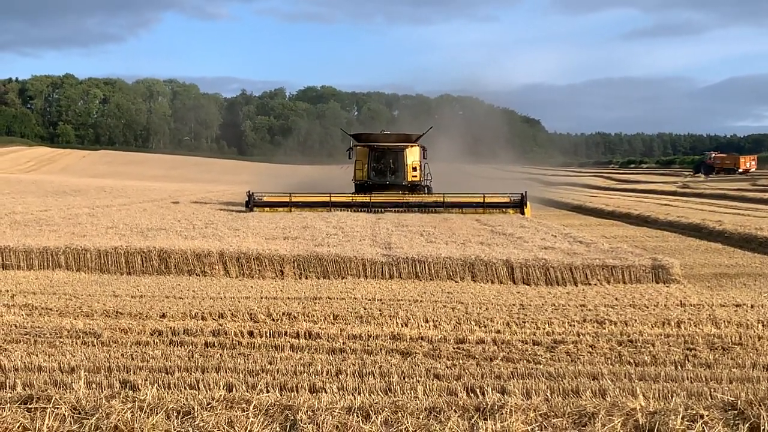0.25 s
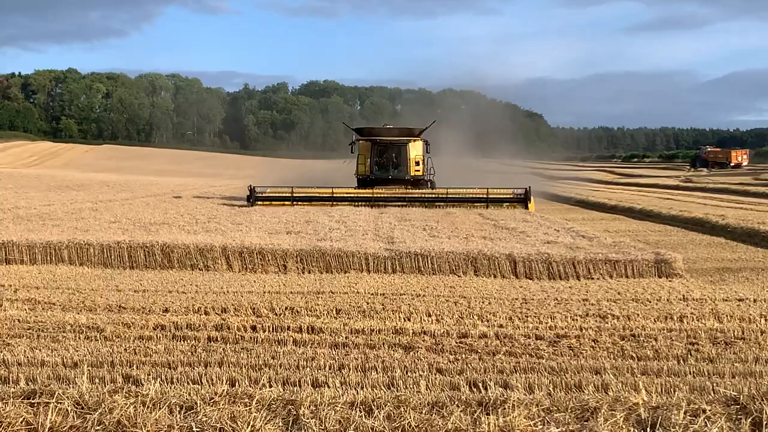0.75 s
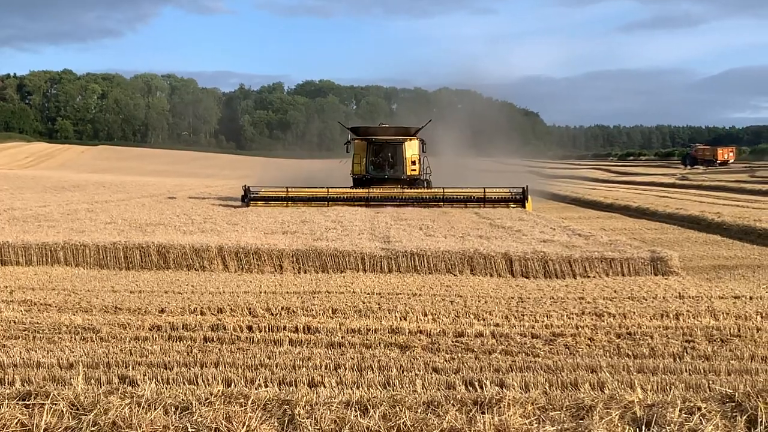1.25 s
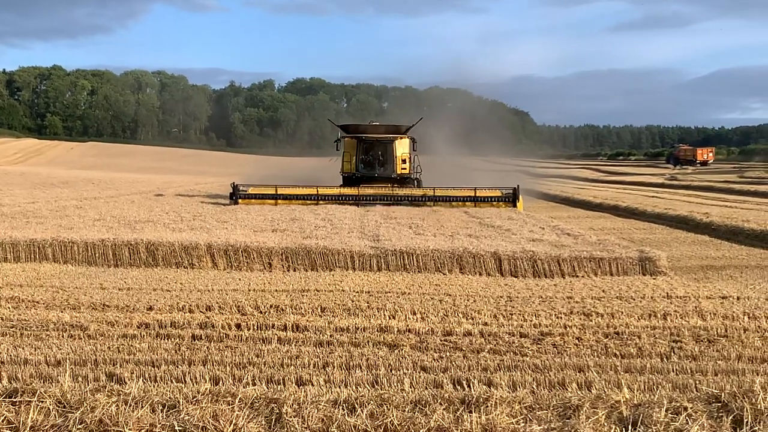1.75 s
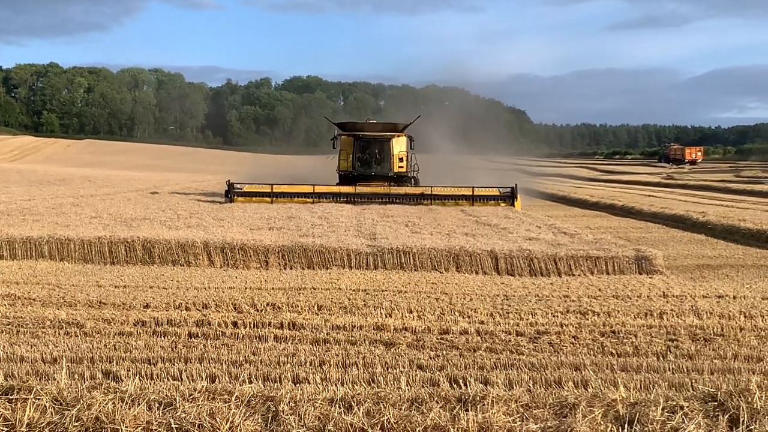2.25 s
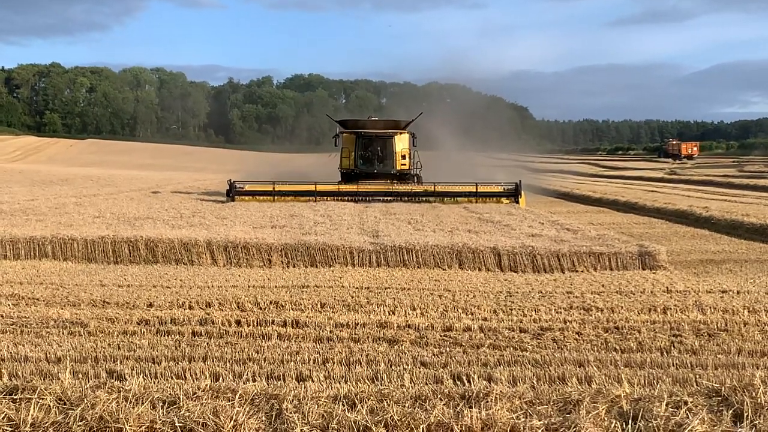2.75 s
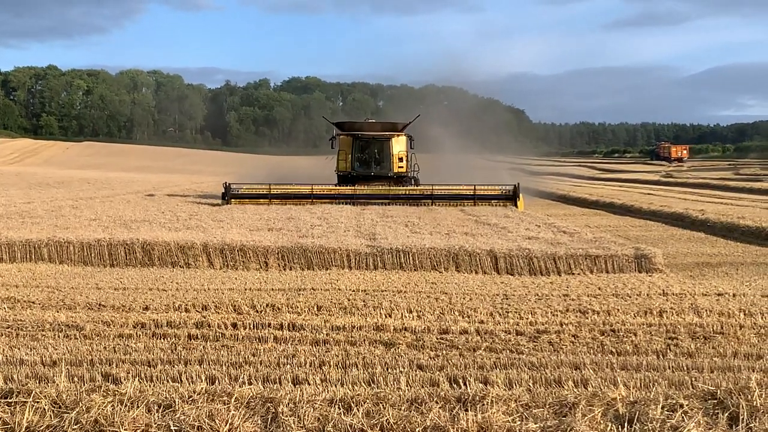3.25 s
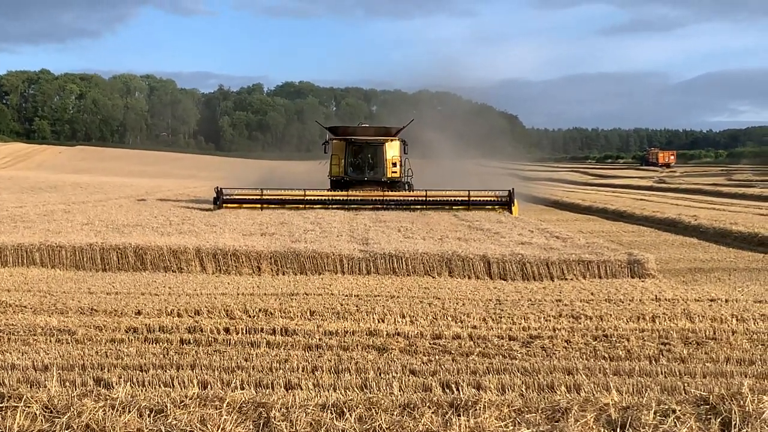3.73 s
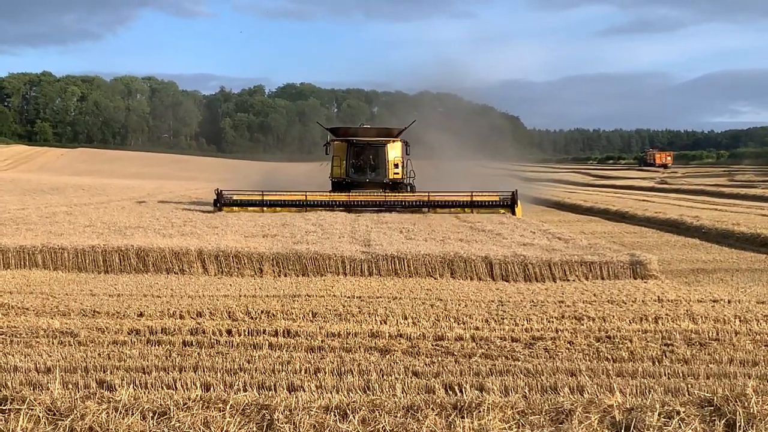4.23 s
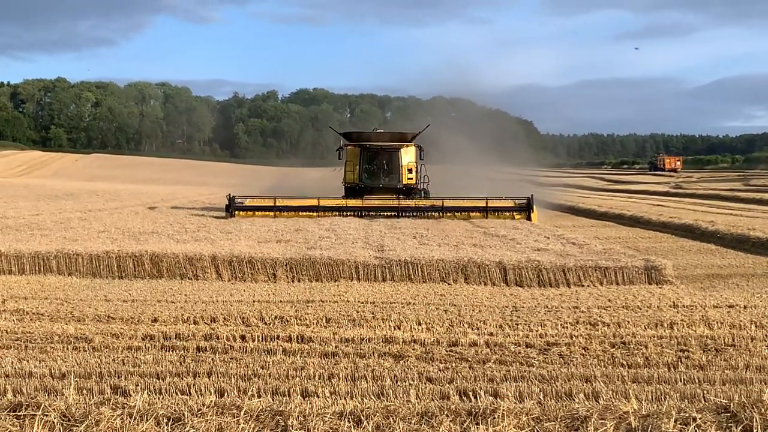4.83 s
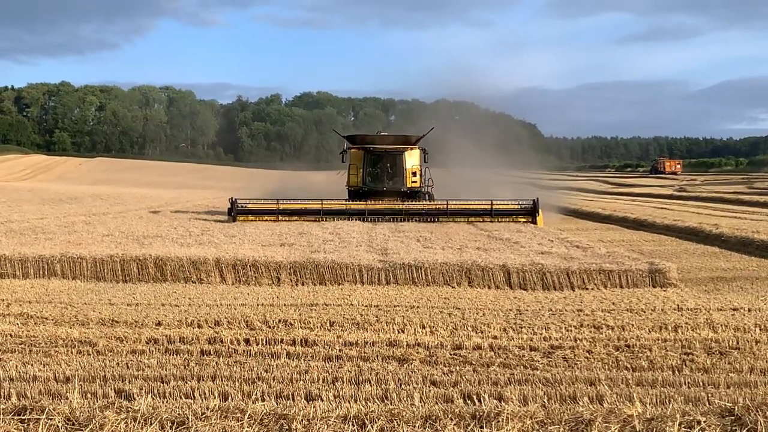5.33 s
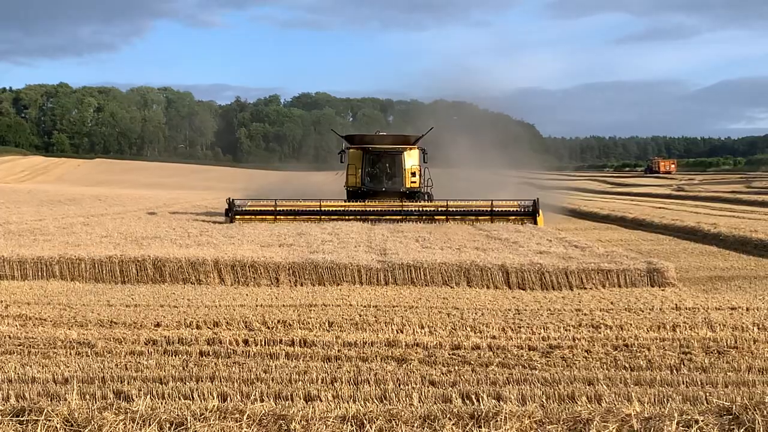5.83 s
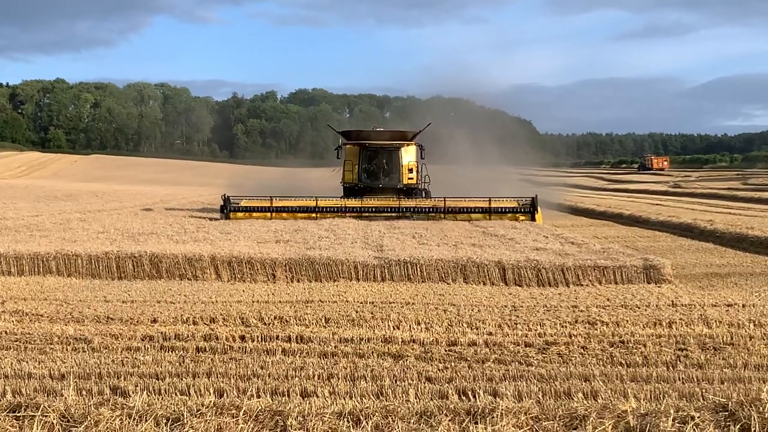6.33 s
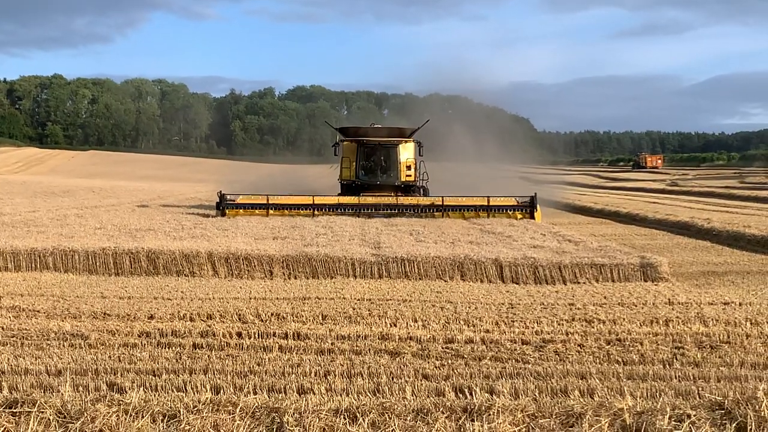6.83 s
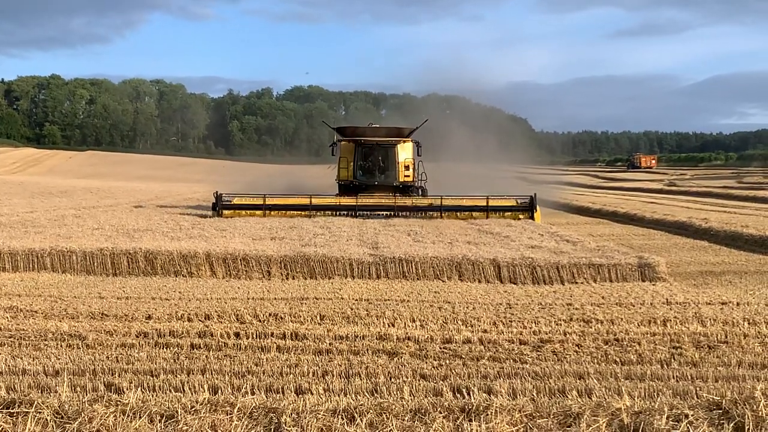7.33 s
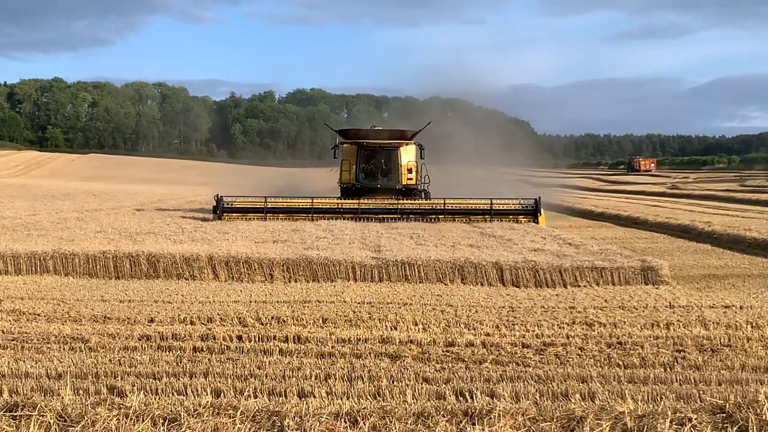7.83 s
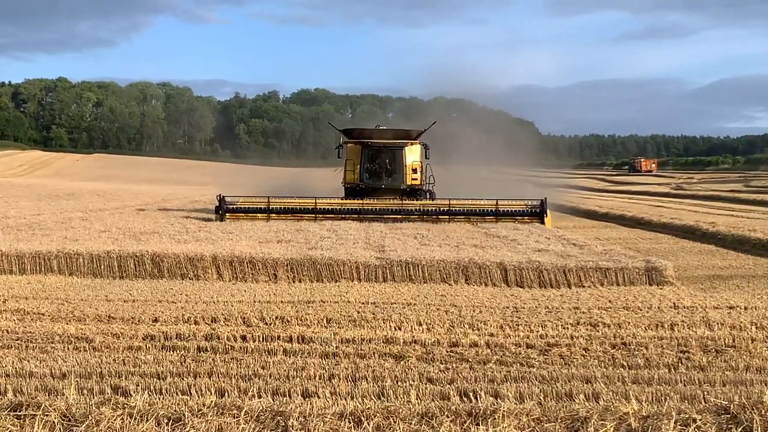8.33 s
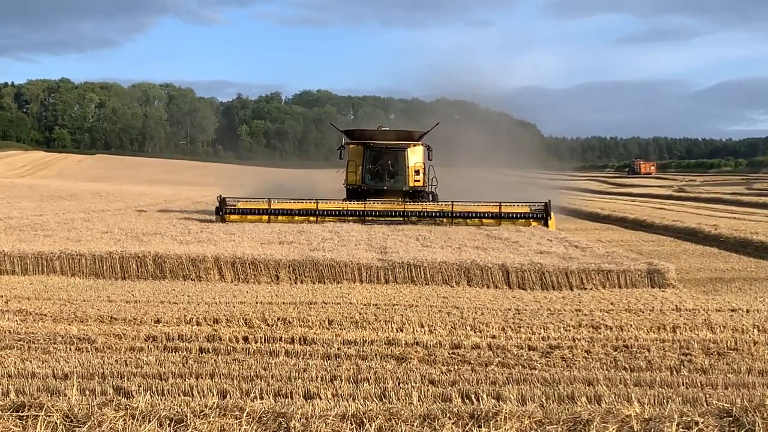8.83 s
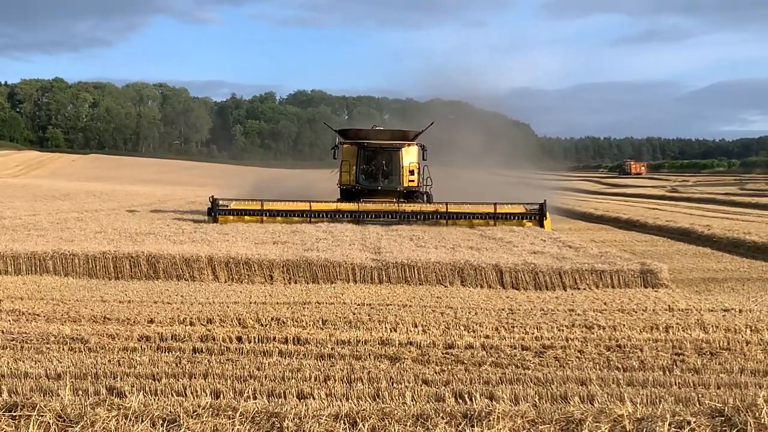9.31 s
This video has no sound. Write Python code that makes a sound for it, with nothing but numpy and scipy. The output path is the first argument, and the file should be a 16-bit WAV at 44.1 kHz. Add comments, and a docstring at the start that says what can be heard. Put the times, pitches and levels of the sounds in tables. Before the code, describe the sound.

From 0 to about 9.5 seconds a combine harvester runs without pause in an open field, starting roughly sixty metres off and coming straight on, so the sound grows slightly louder and fuller. A deep, wavering drone of engine, rotor and threshing drum sits on low rumble, with drum swells near 0.5, 3.7, 4.8, 6.4, 7.7 and 8.6. A thin mid-pitched gear whine flutters rapidly and drifts in strength; a pump hum emerges more after 5. Crop roar and dry chaff hiss shake about five or six times a second, with brief surges and a duller hiss around 3.4 and 5.5. Small dull ticks or knocks come at 1.9, 2.6 and 3. Short panel clanks scatter over a faint patter, denser after 3, strongest near 6.6. The distant hand-held stereo pickup has tight reflections and a diffuse, airy spread.

```python
"""Far across a stubble field, a combine harvester cuts wheat and slowly draws nearer.
Engine, drum, rotor and pump drone as wavering sine tones; the gear whine throbs once a shaft turn.
Crop roar and chaff hiss are bands of noise that follow the beat of the sieves; rumble and growl lie below.
Loose panels ring when struck, and a few dull ticks and knocks are heard.
Short echoes and scattered sound join the direct sound at a hand-held pair of microphone ports."""
import sys
import numpy as np
from scipy import signal
from scipy.fft import rfft, irfft, next_fast_len
from scipy.io import wavfile

SR = 44100
rng = np.random.default_rng(int(sys.argv[2]) if len(sys.argv) > 2 else 0)


def wrap_up_sound(samples):
    """Save the sound to the file named by the first command line argument, as 16-bit audio."""
    columns = np.atleast_2d(samples).T
    # keep every value between -1 and 1, then stretch to whole-number steps
    tamed = np.clip(columns, -1, 1)
    steps = np.round(tamed * 32767).astype(np.int16)
    wavfile.write(sys.argv[1], SR, steps)


N = 422017  # samples, about 9.57 s
SIZE = next_fast_len(N + 2048)  # padded length for work on frequencies
HZ = np.maximum(np.arange(SIZE // 2 + 1) * SR / SIZE, 1)

# Table levels come before nearing, wavering, the paths to the ports and the final trim.
# gear whine, wavering in pitch and level: start_s, pitch_hz, level_db, companion_level_db
GEAR = [(0, 633, -46.5, -53), (.5, 636, -49, -58), (.65, 640, -54, -58), (.8, 635.6, -45.5, -55),
        (1.3, 636.1, -48, -53), (1.8, 635, -48, -65), (2.4, 635, -50, -54), (3.2, 632.4, -55, -65),
        (3.9, 640, -48.5, -66), (4.13, 636, -60, -58), (4.45, 634, -46.5, -58), (4.75, 633.5, -54, -58),
        (5, 632, -51.5, -62), (5.4, 636, -47.5, -66), (6.1, 634, -50.5, -58), (6.6, 639, -45, -51),
        (7, 635.5, -48, -51.5), (7.75, 638, -44.5, -48.5), (8.1, 634, -50, -57), (8.7, 635, -50.5, -55),
        (9.2, 636, -43.5, -51), (9.57, 635.8, -45, -57)]
COMPANION_RATIO = 2.2  # companion pitch over gear pitch
SHAFT_HZ, SHAFT_DEPTH = 23.35, 0.51  # once a turn the gear mesh tightens
FIRING_HZ, DRUM_HZ, PUMP_HZ, HUM_HZ = 95, 144.3, 293.4, 402.2
ROTOR_HZ = 10.71  # a slow rotor, heard by its multiples
# exhaust tones: multiple of the firing rate, level_db
EXHAUST = [(.5, -43.5), (1, -38.5), (2, -39.5), (3, -54)]
# rotor tones: multiple of the rotor rate, level_db
ROTOR = [(6, -39), (7, -42.5), (10, -40.5), (12, -47), (14, -44.5), (15, -43), (16, -50.5), (17, -54),
         (18, -49), (20, -53.5)]
# other steady tones: pitch_hz, level_db
FAINT_TONES = [(34, -53), (45.2, -47), (52.8, -50), (68, -39), (75.8, -40), (89.2, -40.5), (177.8, -46),
               (1157, -61)]
# threshing drum tone, its level rising and falling irregularly: start_s, level_db
DRUM = [(0, -34.5), (.45, -28.5), (1, -33), (3.1, -32.5), (3.7, -26.5), (4.1, -34), (4.8, -27),
        (5.3, -33.5), (6.4, -25.5), (7.1, -32), (7.7, -26), (8.1, -31), (8.6, -25.5), (9.57, -32.5)]
# uneven throbs of the drum: rate_per_s, depth_db, start_turns
DRUM_THROBS = [(5.54, 2.5, 0.13), (2.72, 2.2, 0.54)]
# throb of the tone at half the drum pitch: rate_per_s, depth_db, start_turns
HALF_DRUM_THROB = (2.78, 4.0, 0.077)
HALF_DRUM_DB = -39
# pump and hum rising out of the noise: start_s, pump_db, pump_second_multiple_db, hum_db
HUMS = [(0, -52, -58, -59), (1.0, -51.5, -64, -63), (2.2, -53.5, -62, -56), (3.1, -51, -60, -56.5),
        (4, -51.5, -65, -51.5), (5.2, -49.5, -69, -61), (6.4, -47, -65, -54.5), (7.2, -47, -59, -50),
        (8.1, -47, -73, -53), (9, -44.5, -51, -51), (9.57, -48.5, -53, -45.5)]
# a second pump, nearly as fast, beats with the first: rate_per_s, share (0-1), start_turns
PUMP_BEAT = (.96, .7, .097)

# noise colours, before each layer is set to its level: pitch_hz, level_db (per Hz)
RUMBLE_COLOUR = [(20, -50), (33, -16), (48, -19), (65, -4.5), (80, -2.5), (100, -4), (125, -5), (150, -2),
                 (175, -9.5), (200, -9), (240, -12.5), (275, -26), (330, -45), (450, -63)]
GROWL_COLOUR = [(200, -30), (300, 0), (350, 1), (420, -2), (470, 1), (520, .5), (600, -1.5), (800, 0),
                (910, -13), (1050, -42)]
ROAR_COLOUR = [(800, -22), (910, -8.5), (1050, 0.5), (1300, -0.5), (1550, -5.5), (1800, -6), (2100, -12.5),
               (2400, -16.5), (3000, -23), (3500, -27)]
HISS_COLOUR = [(1900, -28), (2500, -6), (3200, -5), (4300, -0.5), (5500, -2), (7000, -2.5), (9000, -5.5),
               (10200, -7), (11000, -15), (13500, -16.5), (14400, -23)]
# how well the air carries the treble, heard in chaff and fan hiss: start_s, level_db
HISS_LEVEL = [(0, -52), (.5, -48.5), (1.3, -50.5), (1.85, -49), (2.6, -52.5), (3.4, -55), (4.6, -51.5),
              (5.5, -54.5), (6.5, -50.5), (7.3, -48.5), (8.2, -48), (8.8, -48.5), (9.57, -51)]
# layer levels: mean_db, db per dB of nearing, db per dB of hiss swing
RUMBLE_LEVEL, GROWL_LEVEL, ROAR_LEVEL = (-25.5, 0.75, 0.024), (-42, 0.59, 0.28), (-43.5, 1.4, 0.45)
# treble tilt: mean_db_per_octave, more per dB of nearing, more per dB of hiss swing
ROAR_BRIGHTENS = (0.1, 1.9, 0.25)
HISS_BRIGHTENS = (-0.63, 0.94, 0.42)
LOW_GROWL_FILLS = 1  # extra dB per dB of nearing, below 460 Hz
# brief surges and dips of the crop noise: middle_s, half_width_s, roar_db, hiss_db
SURGES = [(.03, .08, 5, 1.5), (.42, .05, 1, 1), (1.13, 0.11, 0, 1.5), (2.37, 0.046, 0.5, 0),
          (2.72, .05, 2.5, 1), (2.98, 0.041, 4, -0.5), (3.73, .04, 2, 2), (4.03, 0.032, 0, 2),
          (4.4, 0.097, 1, -2), (5.49, 0.027, 4, -1.5), (6.64, .03, 1, 2), (7.17, 0.037, -3, 4),
          (7.3, .3, 2, -3.5)]
SIEVE_HZ, SIEVE_START = 5.5, -0.18  # strokes a second, turns at the start
START_M, SPEED_M_PER_S = 64, 1.83  # the harvester comes straight on

# clanks of loose panels and chains: start_s, strike_db
CLANKS = [(.2244, -33), (.9552, -35), (1.7065, -36), (3.4605, -38), (6.7401, -38), (8.8792, -31),
          (9.2439, -29.5), (3.007, -40), (3.0947, -32), (3.1614, -32), (3.7145, -32.5), (4.015, -29),
          (4.3914, -29.5), (4.5526, -35), (4.575, -32), (4.7242, -32.5), (4.7915, -37), (5.3308, -31.5),
          (6.6308, -25.5), (6.9147, -32), (6.9842, -28), (7.1741, -31), (7.5155, -33), (7.6658, -30),
          (7.8334, -33), (8.0371, -40), (8.3684, -30), (8.569, -29), (8.9735, -30), (9.2893, -33)]
RATTLES_PER_S, RATTLE_DB = 35, -45  # fainter clanks at random, lowest strike level
# ringing panel: pitch_hz, level_db, t60_s (time to fade by 60 dB)
PANEL = [(1155, -7.5, 0.021), (1481, -10, 0.043), (1550, -8, 0.03), (1928, -15.5, 0.045),
         (2130, -19, 0.027), (2680, -20, .02)]
# dull ticks and knocks: middle_s, peak_db, pitch_hz
TICKS = [(1.8601, -21, 690), (1.987, -31, 650), (2.555, -25, 600), (2.9631, -24, 300), (3.075, -27, 349.4)]
TICK_CYCLES = 0.61  # half width of the bell

# echoes off ground, hand and body to each port: late_ms, gain (a factor)
LEFT_ECHOES = [(0.393, -0.22), (0.814, -0.25), (1.085, 0.13), (1.45, 0.25), (1.74, -0.21), (1.884, 0.34),
               (2.192, -0.094), (3.709, -0.0024)]
RIGHT_ECHOES = [(0.581, 0.088), (0.836, -0.1), (1.093, 0.025), (1.428, 0.18), (1.5, 0.059), (1.744, -0.13),
                (1.897, 0.23), (2.288, -0.23), (2.917, -0.11), (3.721, 0.033)]
ECHO_CUT_HZ, TREBLE_FROM_HZ = 8400, 3300
# the hand shifts and the air stirs:
# start_s, echo_factor, treble_echo_factor, scatter_db, treble_echo_later_ms
AIR = [(0, 0.98, 1.2, -3, -0.0043), (1.5, 0.99, 1.3, -1, 0.0083), (3.5, 0.99, 1.7, 1, -0.016),
       (4.5, 0.9, 0.82, -1, .015), (6, 0.83, 0.36, -1, 0.0026), (7.5, 0.92, 0.82, -1.5, 0.0029),
       (9.57, 0.94, 0.51, -2, 0.026)]
# sound unlike at the two ports: pitch_hz, share_db
SCATTER = [(45, -9), (70, -15.5), (140, -17), (250, -18.5), (500, -12.5), (620, -3), (710, -10),
           (780, -3.5), (900, -5), (1050, -12.5), (2000, -9), (3000, -4), (4000, -1.5), (6600, -3.5),
           (8300, -62), (8900, -4.5), (9900, 0.5), (10500, -30), (11600, -26), (12100, -2), (12600, -31)]
# level difference between the ports: pitch_hz, left_over_right_db
PORT_BALANCE = [(40, 2), (140, 2.5), (200, 8), (280, 4), (420, -1.6), (490, -1.2), (690, -11), (860, -1.5),
                (990, -8.5), (1200, 0), (1400, -2.5), (1800, -1.5), (2100, -1.5), (3200, -2.5),
                (4300, -4.5), (5500, -7.5), (7000, -1), (8000, 0)]
# phase between the ports: pitch_hz, left_ahead_radians
PORT_PHASE = [(100, 0), (200, -.25), (330, -1.06), (420, -1.1), (650, 0.1), (745, 0.72), (910, -0.8),
              (1090, 0.9), (1400, 0.32), (1650, -0.23), (1800, 0.67), (2200, 0.5), (3200, 0.92),
              (5400, 1.54), (5700, -0.5), (6600, 1), (8350, -3.5), (8950, -3), (10400, -6), (11700, -6),
              (12500, -9.5)]
# hollows of the housing before each port: pitch_hz, width_hz, left_db, right_db
HOUSING = [(2380, 65, 2, 3), (3000, 69, -1.5, -0.5), (4550, 90, -3, -2.5), (4430, 180, 0, 0),
           (4850, 140, 2, 0.5), (5150, 90, 4, 1), (5350, 140, -1, 2.5), (5940, 130, -1, 0.5),
           (6200, 150, 0, -1.5), (7400, 130, -0.5, -2.5)]
CUTOFF_HZ = 14400


def from_db(db):
    """Turn decibels into a plain factor."""
    return np.exp(np.asarray(db) * np.log(10) / 20)


def rms_one(x):
    """Scale a signal to an rms (average strength) of one."""
    return x / np.sqrt(np.mean(x ** 2) + 1e-20)


def in_time(rows):
    """Join the rows of a table by straight lines, one curve per column after the time."""
    s, *columns = np.transpose(rows)
    t = np.arange(N) / SR
    return [np.interp(t, s, column) for column in columns]


def over_hz(points):
    """Read a table at every frequency, straight on a log axis."""
    hz, value = np.transpose(points)
    return np.interp(np.log(HZ), np.log(hz), value)


def shaped(x, response):
    """Multiply each frequency of a sound by a response."""
    return irfft(rfft(x, SIZE) * response, SIZE)[..., :N]


def drift(rate):
    """Slow random wandering with a spread of about one; a higher rate (Hz) wanders faster."""
    step = 40  # samples between computed points
    r = np.exp(-2 * np.pi * step * rate / SR)
    chance = rng.standard_normal(N // step + 2002)
    slow = signal.lfilter([1], [1, -2 * r, r * r], chance)[2000:]
    return np.interp(np.arange(N) / step, np.arange(len(slow)), rms_one(slow))


def cycle(per_s, start):
    """A steady swing between -1 and 1."""
    return np.cos(2 * np.pi * (per_s * np.arange(N) / SR + start))


def swing(db):
    """A level curve about its own mean."""
    return db - db.mean()


def follows(law, first_db, second_db):
    """A mean value plus shares of two controls."""
    mean, first, second = law
    return mean + first * first_db + second * second_db


def tone(hz, db, waver_db, wander_hz):
    """A sine at an rms level, shaken in level and pitch by the air it crosses."""
    turns = np.cumsum(hz + wander_hz * drift(3.07)) / SR + rng.random()
    level = from_db(db + waver_db * drift(4.7))
    return np.sqrt(2) * level * np.sin(2 * np.pi * turns)


def multiples(hz, table, waver_db, wander):
    """Multiples of one shaft share its slightly uneven speed; each wavers in level on its own."""
    turns = hz * np.cumsum(1 + wander * drift(0.94)) / SR
    out = np.zeros(N)
    for multiple, db in table:
        level = from_db(db + waver_db * drift(2.5))
        out += np.sqrt(2) * level * np.sin(2 * np.pi * (multiple * turns + rng.random()))
    return out


def patchy_noise(colour, edges, shared_db, own_db, own_rate, slow_db=0):
    """Coloured noise in bands; each follows the shared gain and flickers on its own.
    Shape (band, path, time): the direct path and one scattered path to each port."""
    noise = rfft(rng.standard_normal((3, SIZE))) * from_db(over_hz(colour))
    noise = noise.astype(np.complex64)
    bands = np.array([irfft(noise * ((HZ >= low) & (HZ < high)), SIZE)[:, :N]
                      for low, high in zip(edges, edges[1:])])
    flicker_db = np.array([own_db * drift(own_rate) + slow_db * drift(3.2) for _ in bands])
    bands *= from_db(shared_db + flicker_db)[:, None]
    return bands / np.sqrt(np.mean(bands.sum(axis=0) ** 2))


def tilted(bands, octaves, tilt_db):
    """Add the bands, each lifted by a changing tilt times its octaves from the pivot."""
    return (bands * from_db(octaves * tilt_db)[:, None]).sum(axis=0)


def nearing():
    """Gain in dB from the shrinking distance, about its mean."""
    distance_m = START_M - SPEED_M_PER_S * np.arange(N) / SR
    return swing(-20 * np.log10(distance_m))


def surges():
    """Bell-shaped lifts and dips of roar and hiss, in dB."""
    s, width_s, *db = np.transpose(SURGES)
    t = np.arange(0, N / SR + .01, .002)
    bells = np.exp(-((t - s[:, None]) / width_s[:, None]) ** 2)
    return in_time(np.c_[t, (np.array(db) @ bells).T])


def sieve_beat():
    """Gain in dB: the sieves throw the crop to and fro, every second stroke stronger."""
    turns = SIEVE_HZ * np.arange(N) / SR + SIEVE_START + .04 * drift(0.78)
    return 0.92 * np.cos(2 * np.pi * turns) + 0.59 * np.cos(np.pi * turns)


def ticks():
    """Dull ticks and knocks: a few swings of a wave under a bell-shaped envelope."""
    out, t = np.zeros(N), np.arange(-400, 400) / SR
    for s, db, hz in TICKS:
        bell = np.exp(-(t * hz / TICK_CYCLES) ** 2)
        out[round(s * SR) - 400:][:800] += from_db(db) * np.cos(2 * np.pi * hz * t) * bell
    return out


def struck(events, modes, spread_db):
    """A short burst of soft touches rings every mode with a strength of its own."""
    s, strike_db = np.transpose(events)
    chance = rng.standard_normal((len(s), len(modes), 6))
    out = np.zeros(N)
    # tick, hit and four bounces (s late, dB)
    touches = [(-.007, -7.5), (0, 1), (.003, -1.5), (.014, -6), (.021, -3.5), (.029, -7)]
    for k, (hz, db, t60) in enumerate(modes):
        clicks = np.full(N, 1e-18)
        for touch, (late_s, touch_db) in enumerate(touches):
            at = np.clip(((s + late_s) * SR).astype(int), 0, N - 1)
            clicks[at] += from_db(strike_db + db + touch_db + spread_db * chance[:, k, touch])
        # a resonator that fades by 60 dB in t60 seconds
        r, w = from_db(-60 / (t60 * SR)), 2 * np.pi * hz / SR
        out += signal.lfilter([0, np.sin(w)], [1, -2 * r * np.cos(w), r * r], clicks)
    band = signal.butter(2, [900, 2600], "band", fs=SR, output="sos")
    return signal.sosfilt(band, out)


def clatter():
    """Loose panels ring with clear clanks and a random patter of fainter ones."""
    draws = rng.random((600, 2))
    times_s = np.cumsum(-np.log(draws[:, 0])) / RATTLES_PER_S
    patter = np.c_[times_s, RATTLE_DB + 8.0 * draws[:, 1] ** 2]
    patter = patter[patter[:, 0] < N / SR]
    return struck(CLANKS, PANEL, spread_db=2.5) + struck(patter, PANEL, spread_db=4.0)


def rumble(near_db, hiss_swing_db):
    """Low noise in two bands that flicker slowly."""
    noise = patchy_noise(RUMBLE_COLOUR, [10, 110, 500], 0, own_db=0.85, own_rate=3.5).sum(axis=0)
    return from_db(follows(RUMBLE_LEVEL, near_db, hiss_swing_db)) * noise


def growl(near_db, hiss_swing_db):
    """Middle noise in two bands, the lower one filling out as the machine nears."""
    low, high = patchy_noise(GROWL_COLOUR, [150, 460, 1100], 0, own_db=0.64, own_rate=4.6)
    noise = from_db(LOW_GROWL_FILLS * near_db) * low + high
    return from_db(follows(GROWL_LEVEL, near_db, hiss_swing_db)) * noise


def hiss(near_db, hiss_db, surge_db, beat, gust):
    """Chaff and fan air: bright noise in fast-flickering bands."""
    edges = np.array([1800, 2900, 3900, 4600, 5150, 6500, 16000])
    shared_db = 0.1 * beat + 0.72 * gust
    bands = patchy_noise(HISS_COLOUR, edges, shared_db, own_db=1.05, own_rate=28.0, slow_db=0.6)
    tilt_db = follows(HISS_BRIGHTENS, near_db, swing(hiss_db))
    noise = tilted(bands, np.log2(edges[:-1, None] / 4500), tilt_db)
    return from_db(hiss_db + surge_db) * noise


def roar(near_db, hiss_swing_db, surge_db, beat, gust):
    """Crop rushing through the machine: noise bands that follow the sieves."""
    shared_db = np.array([[.9], [1.1], [.45]]) * beat + 0.26 * gust
    bands = patchy_noise(ROAR_COLOUR, [720, 1300, 1950, 3710], shared_db, own_db=1.16, own_rate=11.6)
    octaves = np.log2([[1000 / 1500], [1], [2300 / 1500]])
    noise = tilted(bands, octaves, follows(ROAR_BRIGHTENS, near_db, hiss_swing_db))
    return from_db(follows(ROAR_LEVEL, near_db, hiss_swing_db) + surge_db) * noise


def gear_whine():
    """The mesh tone throbs at shaft rate, which puts a side tone above and below it."""
    hz, db, companion_db = in_time(GEAR)
    shaft_turns = np.cumsum(SHAFT_HZ + 1.297 * drift(0.79)) / SR
    throb = 1 + SHAFT_DEPTH * np.sin(2 * np.pi * shaft_turns)
    mesh = throb * tone(hz, db, waver_db=1.0, wander_hz=0.707)
    return mesh + tone(COMPANION_RATIO * hz, companion_db, waver_db=2.5, wander_hz=0.78)


def threshing_drum(near_db):
    """The drum tone and a tone at half its pitch, both throbbing unevenly."""
    drum_db = in_time(DRUM)[0]
    drum_db = drum_db + sum(db * cycle(per_s, start) for per_s, db, start in DRUM_THROBS)
    per_s, depth_db, start = HALF_DRUM_THROB
    half_db = HALF_DRUM_DB + near_db + depth_db * cycle(per_s, start)
    drum_tone = tone(DRUM_HZ, drum_db, waver_db=1.0, wander_hz=0.33)
    return drum_tone + tone(DRUM_HZ / 2, half_db, waver_db=3.5, wander_hz=0.13)


def pump_and_hum():
    """Two pumps close in speed swell and sink together as one beating tone, beside a hum."""
    pump_db, second_db, hum_db = in_time(HUMS)
    per_s, share, start = PUMP_BEAT
    # strength of two sines added, one slowly slipping past the other
    beating = np.sqrt(1 + share ** 2 + 2 * share * cycle(per_s, start))
    out = beating * tone(PUMP_HZ, pump_db, waver_db=0.6, wander_hz=0.25)
    out += tone(HUM_HZ, hum_db, waver_db=2.0, wander_hz=0.576)
    return out + tone(2 * PUMP_HZ, second_db, waver_db=5.0, wander_hz=1.0)


def drone(near_db):
    """Turning parts add up: exhaust and rotor multiples, steady tones, drum, pump and hum."""
    shafts = multiples(FIRING_HZ, EXHAUST, waver_db=2.0, wander=0.003)
    shafts += multiples(ROTOR_HZ, ROTOR, waver_db=1.2, wander=0.0014)
    faint = sum(tone(hz, db + near_db, waver_db=2.3, wander_hz=0.18) for hz, db in FAINT_TONES)
    return from_db(near_db) * shafts + faint + threshing_drum(near_db) + pump_and_hum()


def machine():
    """All that the harvester sends across the field: (direct, scattered left, scattered right)."""
    near_db = nearing()
    hiss_db, = in_time(HISS_LEVEL)
    hiss_swing_db = swing(hiss_db)
    roar_surge_db, hiss_surge_db = surges()
    beat, gust = sieve_beat(), drift(6.5)
    out = rumble(near_db, hiss_swing_db) + growl(near_db, hiss_swing_db)
    out += hiss(near_db, hiss_db, hiss_surge_db, beat, gust)
    out += roar(near_db, hiss_swing_db, roar_surge_db, beat, gust)
    out[0] += clatter() + gear_whine() + drone(near_db)  # these are not scattered
    return out


def echoes(table):
    """Response of short, dulled echoes; with the direct sound they form a comb."""
    late = sum(gain * np.exp(-2j * np.pi * HZ * ms / 1000) for ms, gain in table)
    return late / (1 + (HZ / ECHO_CUT_HZ) ** 8)


def scattered(paths):
    """What crop, trees and moving air scatter is unrelated at the two ports."""
    return shaped(paths, from_db(over_hz(SCATTER)))


def scene():
    """The machine reaches each port directly, by near echoes and scattered; ticks join in."""
    direct, *paths = machine()
    strength, treble_strength, scatter_db, later_ms = in_time(AIR)
    response = np.array([echoes(LEFT_ECHOES), echoes(RIGHT_ECHOES)])
    treble = 1 / (1 + (TREBLE_FROM_HZ / HZ) ** 6)
    at = np.arange(N)
    # treble echoes arrive a little later or sooner as time goes on
    moving = np.array([np.interp(at - later_ms * SR / 1000, at, side)
                       for side in shaped(direct, response * treble)])
    near = strength * shaped(direct, response * (1 - treble)) + treble_strength * moving
    far = from_db(scatter_db) * scattered(np.array(paths))
    return from_db(-1.0) * (direct + near + ticks() + far)


def housing():
    """Hollows before each port lift or dip narrow bell-shaped ranges."""
    hz, width_hz, *db = np.transpose(HOUSING)
    bells = np.exp(-((HZ - hz[:, None]) / width_hz[:, None]) ** 2)
    return from_db(np.array(db) @ bells)


def record(dry):
    """The two ports differ in level and phase; the top is cut."""
    phase = np.interp(HZ, *np.transpose(PORT_PHASE))
    # each port takes half the difference, in opposite directions
    half = from_db(over_hz(PORT_BALANCE) / 2) * np.exp(.5j * phase)
    fade_in = np.minimum(np.arange(N) / 150, 1)
    ports = shaped(dry * fade_in, np.array([half, 1 / half]) * housing())
    top_cut = signal.ellip(10, .5, 70, CUTOFF_HZ, fs=SR, output="sos")
    return signal.sosfilt(top_cut, ports)


dry = scene()
out = record(dry)
wrap_up_sound(out)
```